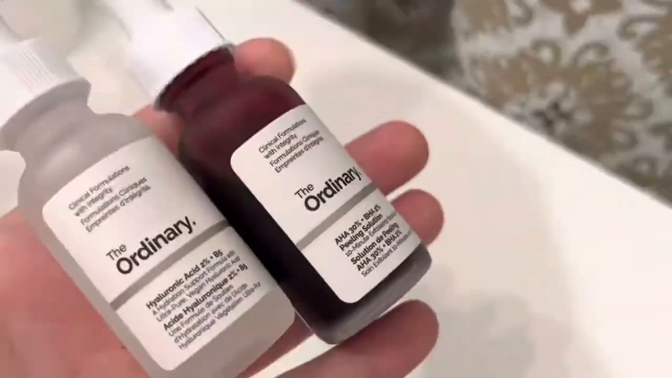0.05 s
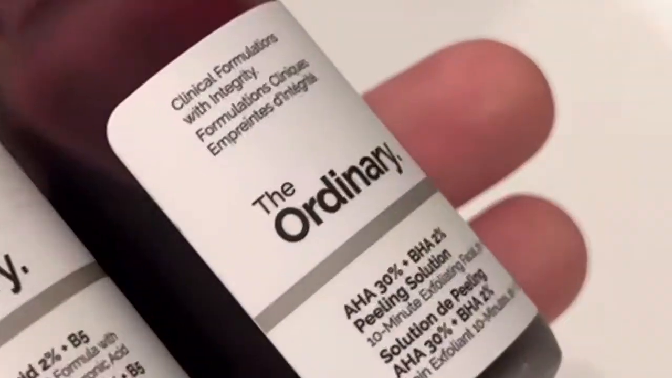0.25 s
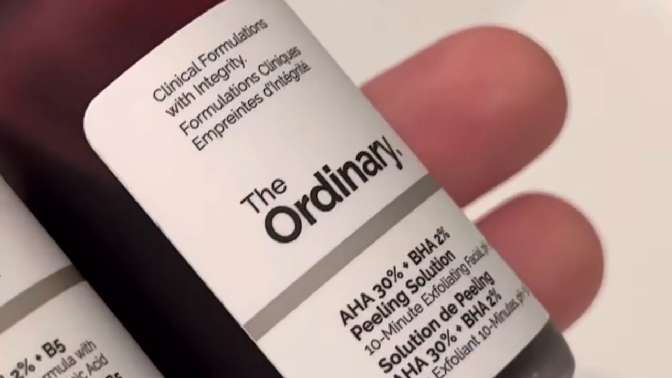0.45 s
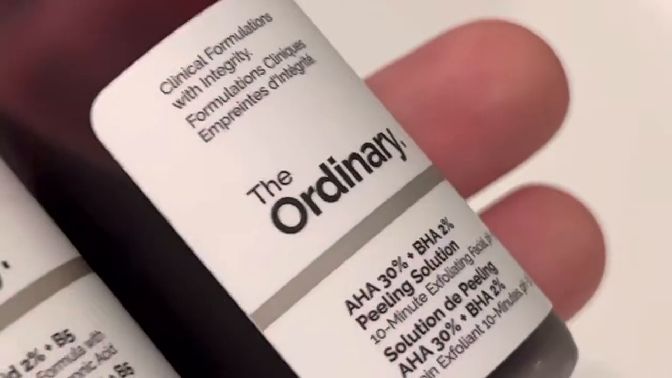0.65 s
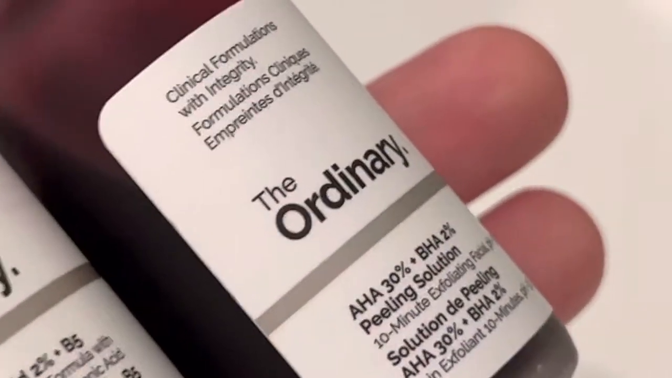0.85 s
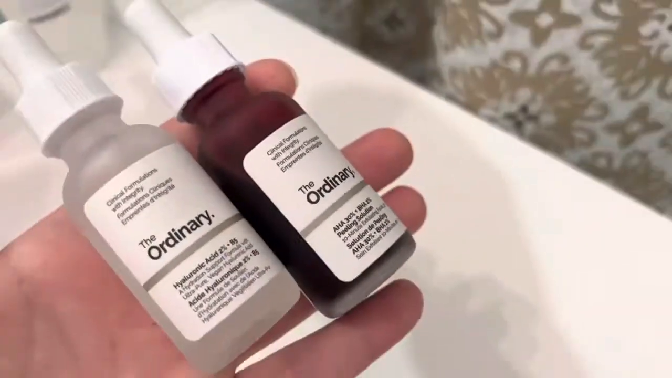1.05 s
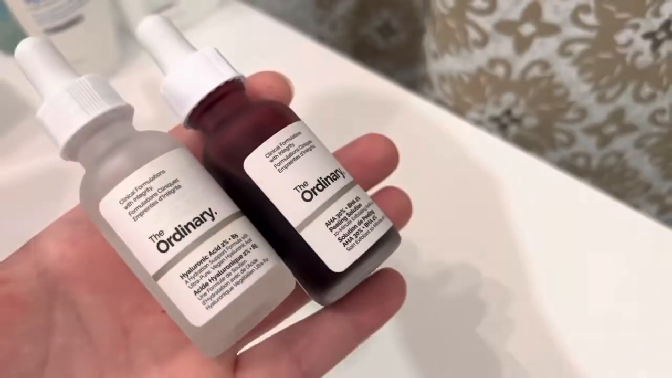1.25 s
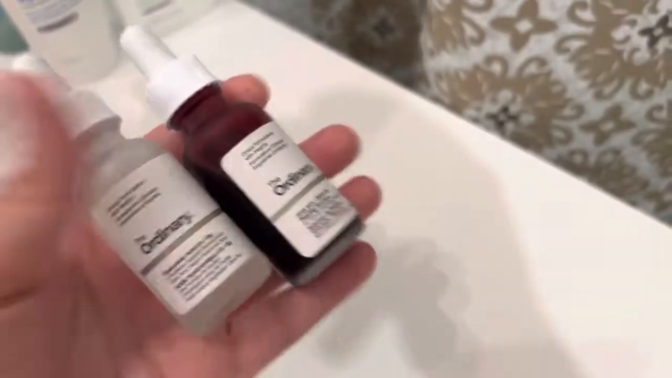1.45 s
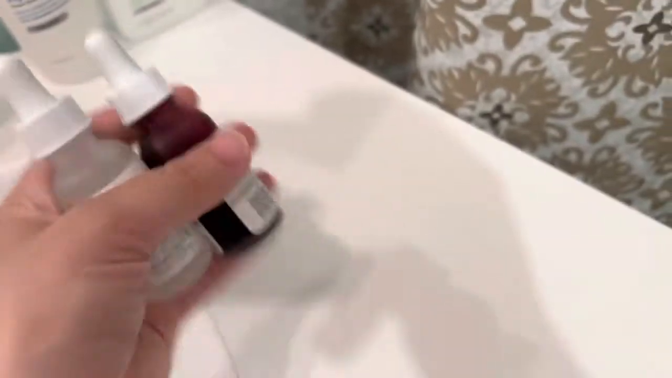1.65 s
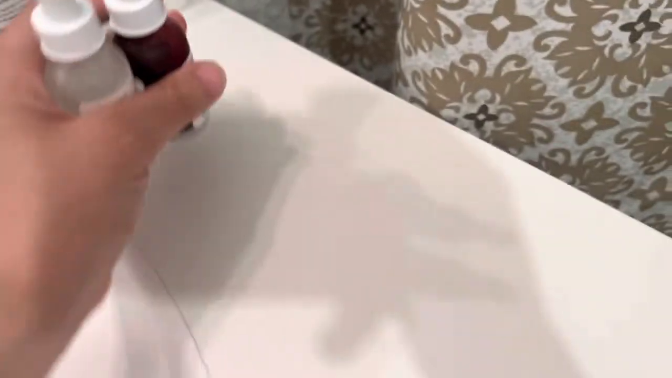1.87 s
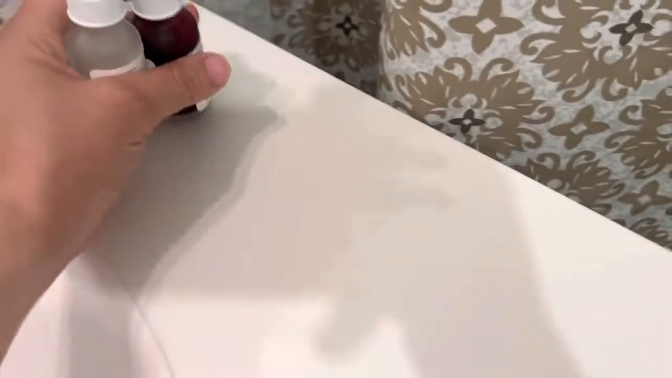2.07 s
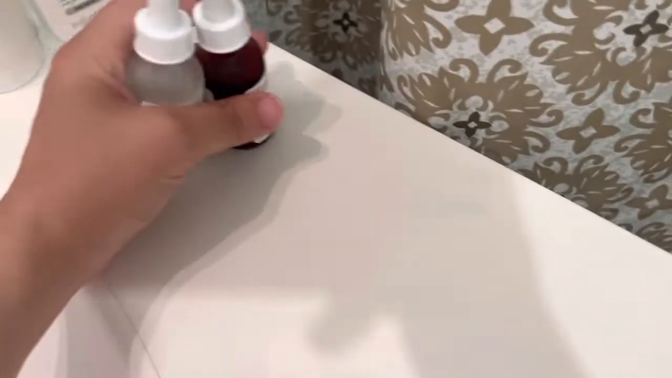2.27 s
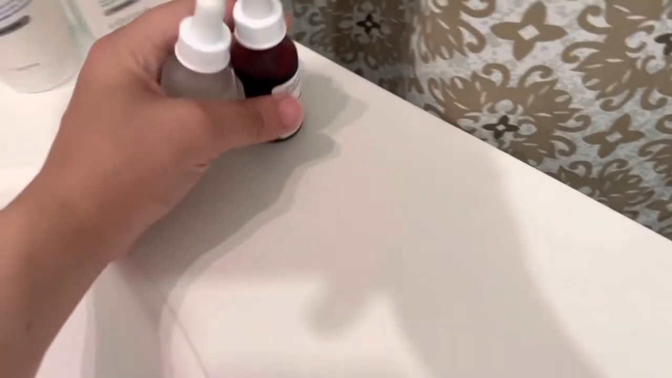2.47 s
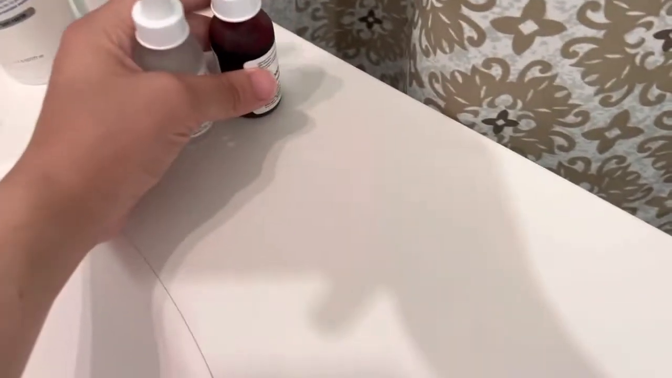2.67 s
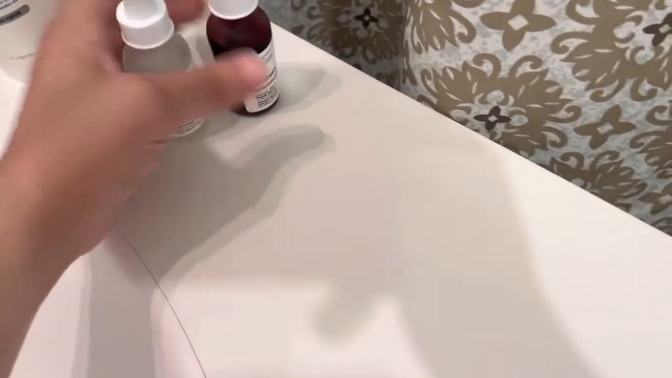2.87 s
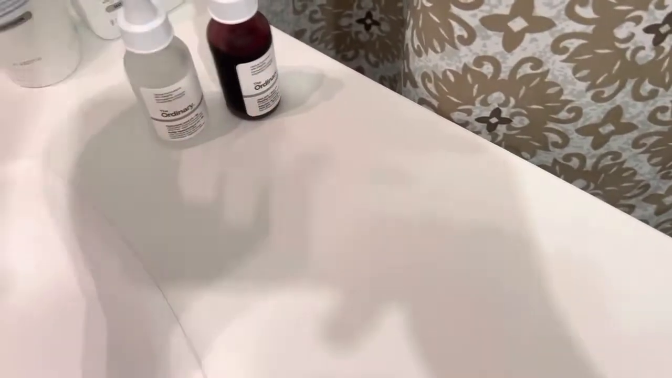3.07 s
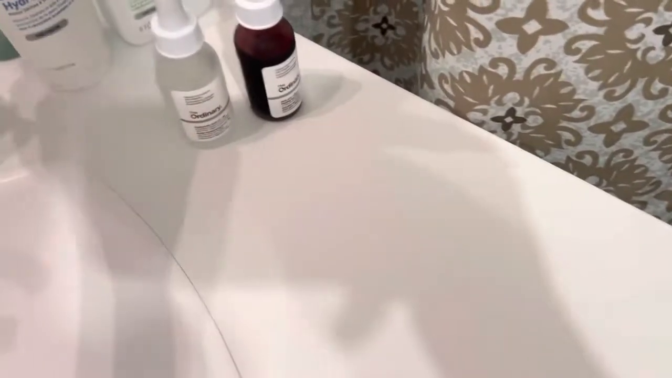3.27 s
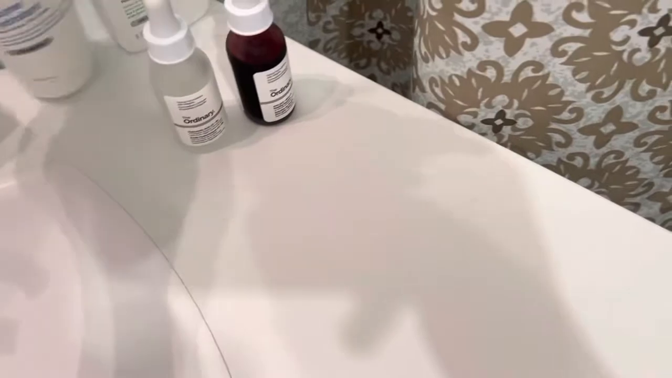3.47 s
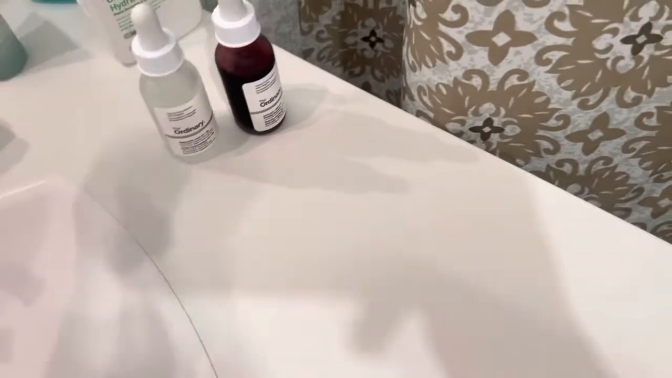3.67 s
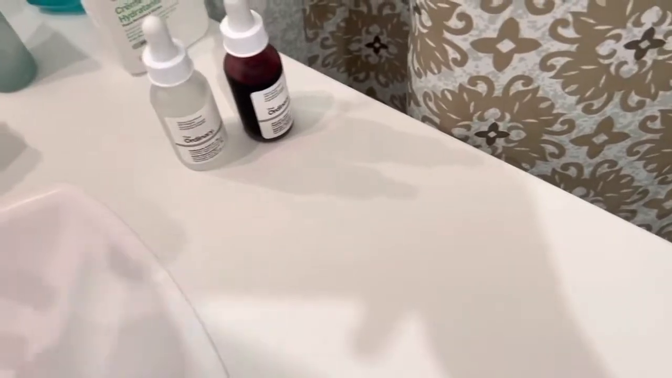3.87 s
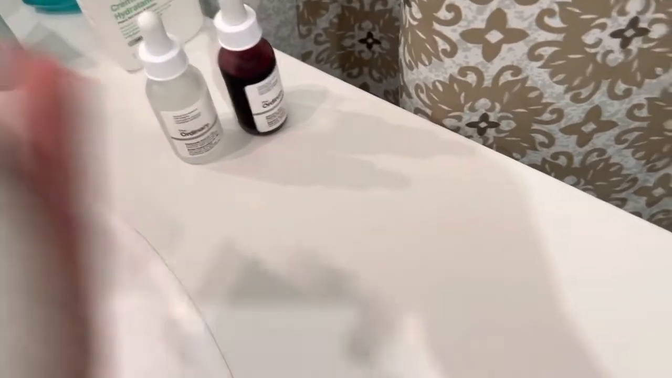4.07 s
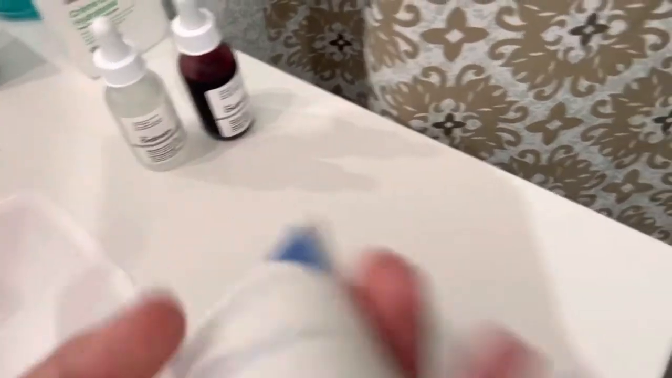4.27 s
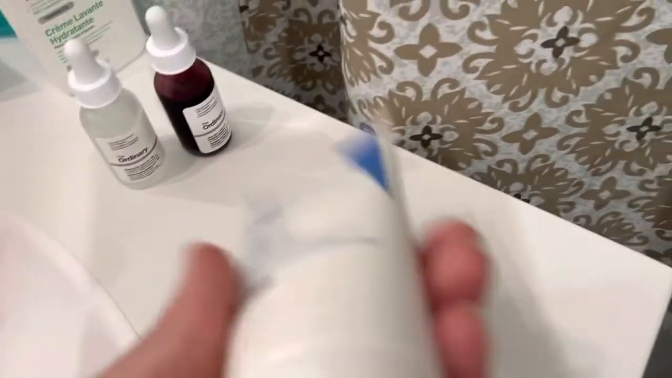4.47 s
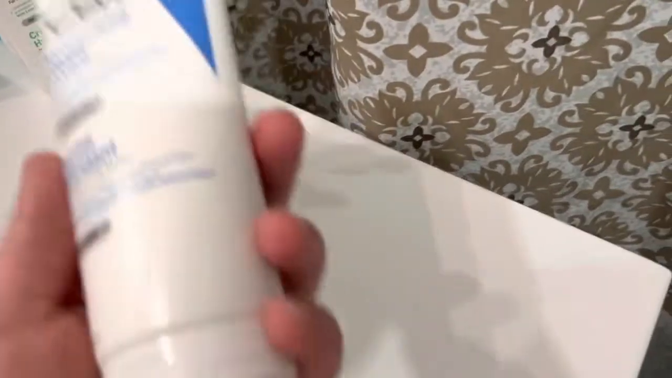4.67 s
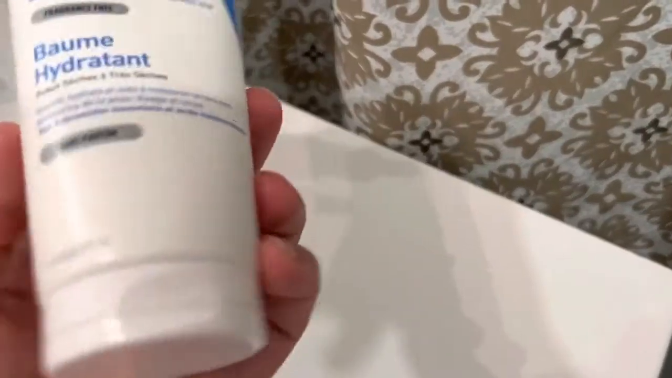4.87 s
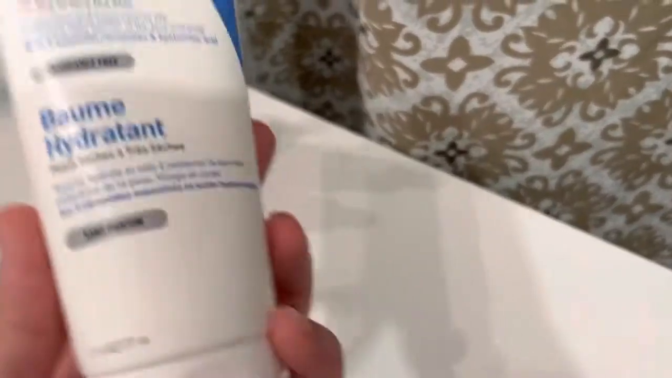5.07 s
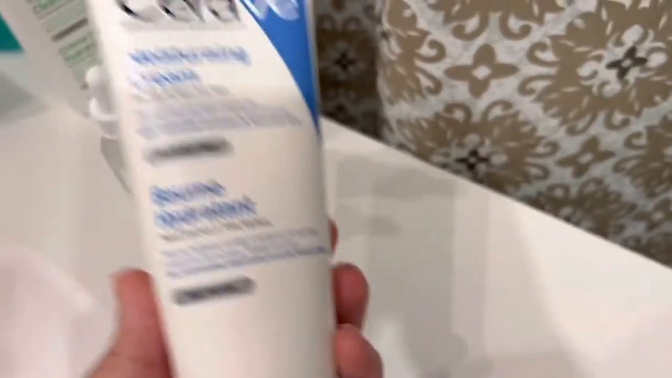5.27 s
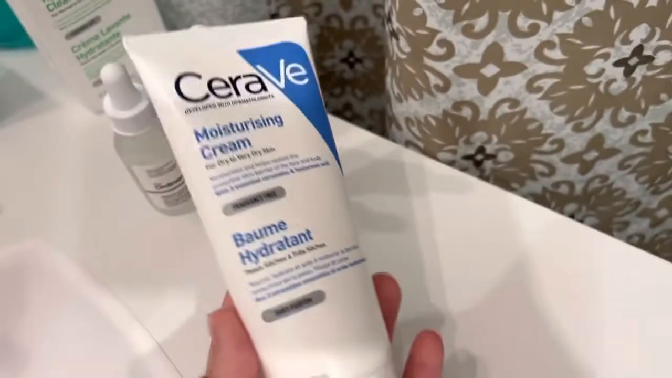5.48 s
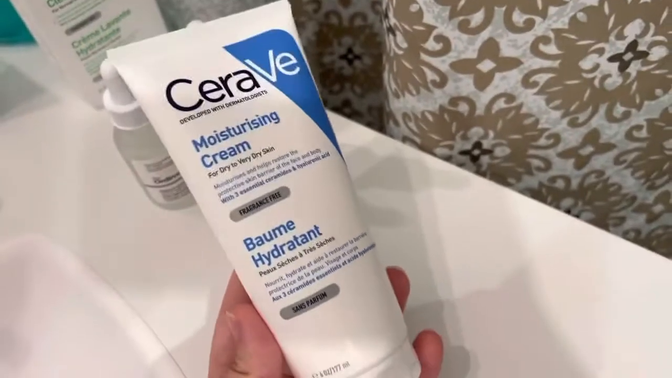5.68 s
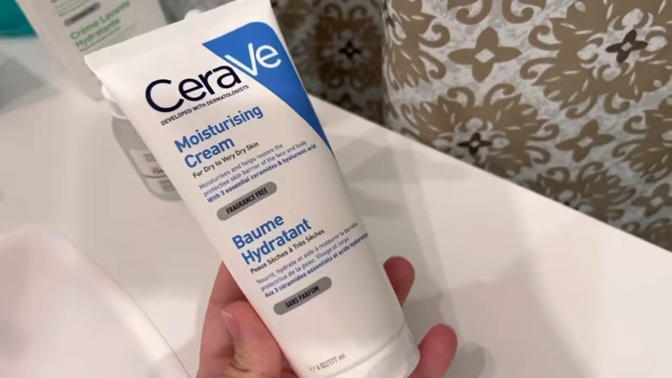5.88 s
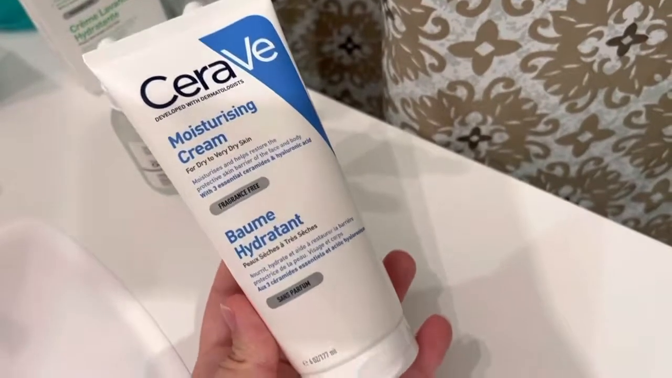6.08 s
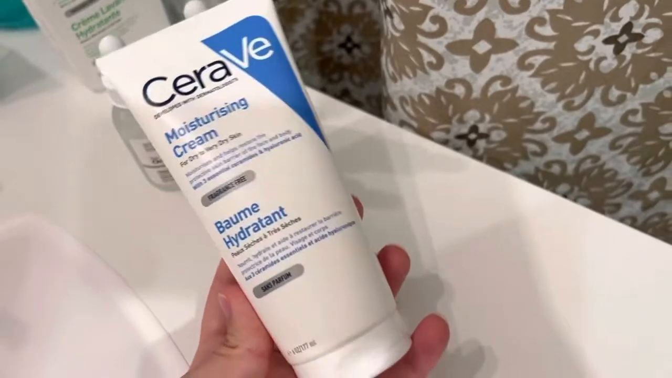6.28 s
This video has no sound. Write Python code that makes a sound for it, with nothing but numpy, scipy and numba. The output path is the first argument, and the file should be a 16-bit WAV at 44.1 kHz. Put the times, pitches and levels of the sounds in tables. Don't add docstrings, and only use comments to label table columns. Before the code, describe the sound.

A small, hard bathroom heard through a close stereo phone microphone, with a very quiet low building hum and slight hiss throughout. The first two seconds are nearly silent, with only barely audible finger brushes. At about 2.1 s a small glass bottle lands on a hollow stone counter with a sharp knock, a bounce and a smaller bounce by 2.2 s. At 2.46 s the second bottle lands slightly harder, with quick weakening bounces. Two duller knocks at 2.82 and 2.86 s settle it flat; counter and tiles ring briefly. From 3.3 s a faint bump and soft skin friction begin, with a light bright tap at 3.67 s. A firm double-edged plastic tap comes at 4.1 s, the rustle strongest around it, then fading until 4.9 s. A small cap clicks faintly at 5.1 s, followed by tiny ticks, a faint low bump near 5.5 s and near silence to about 6.4 s.

```python
import sys
import numpy as np
from scipy import signal
from scipy.io import wavfile
from scipy.ndimage import uniform_filter1d, map_coordinates
from numba import njit

SR = 44100
rng = np.random.default_rng(int(sys.argv[2]) if len(sys.argv) > 2 else 0)


def dump(signal):
    limited = np.clip(np.atleast_2d(signal).T, -1, 1)
    pcm = np.round(limited * 32767).astype(np.int16)
    wavfile.write(sys.argv[1], SR, pcm)


N = 279153
SIDES = np.array([[1], [-1]])


def undb(db):
    return 10 ** (np.asarray(db) / 20)


def read(table, hz):
    return np.interp(np.log(hz), np.log([f for f, _ in table]), [v for _, v in table])


@njit
def svf(x, hz, width):
    y, b, l = np.empty(len(x)), 0., 0.
    g, k = np.tan(np.pi * hz / SR), width / hz
    for i in range(len(x)):
        v = (b + g * (x[i] + 1e-18 - l)) / (1 + g * (g + k))
        b, l, y[i] = 2 * v - b, l + 2 * g * v, k * v
    return y


def band(x, hz, width_hz):
    hz, width_hz = 1. * hz, 1. * width_hz
    return np.array([svf(svf(c, hz, width_hz), hz, width_hz) for c in x])


def pair(noise, alike):
    alike = np.clip(alike, -.99, .99)
    mid, side = np.sqrt(1 + alike) * noise[0], np.sqrt(1 - alike) * noise[1]
    return (mid + side * SIDES) / np.sqrt(2)


def walk(rate_hz):
    k = int(SR / rate_hz)
    steps = np.repeat(rng.standard_normal(N // k + 1), k)
    return 1.3 * uniform_filter1d(uniform_filter1d(steps, k), k)[:N]


# pitch_hz, level_db
BLOW = [(50, -33), (130, -13), (300, -0.5), (1100, 1), (2000, -6), (3000, 9.5), (4500, 1), (6500, 0.5),
        (9000, 3.5), (12000, 2.5), (15500, -6.5)]
# pitch_hz, level_db
WET = [(60, -3), (300, -4.5), (1100, 3.5), (2500, -4), (5000, -0.5), (9000, 3), (15000, -2.5)]
# delay_s, level_db
ECHOES = [(.0022, -3), (.0049, -8), (.0084, -10.5), (0.0129, -8.5)]
# pitch_hz, fade_60db_s
ROOM = [(80, .45), (210, 0.57), (560, 0.38), (1470, 0.084), (2600, 0.29), (4500, 0.13), (8500, 0.24),
        (13000, .25)]
# pitch_hz, likeness (-1 to 1, no unit)
ROOM_ALIKE = [(60, 0.85), (130, 0.93), (290, 0.3), (640, 0.3), (1410, 0), (3100, -0.1), (6820, 1),
              (15000, 0.7)]


def click_in_room(colour, tick_db, room_db, tail_db, build_s, lag, pan_db):
    t = np.arange(SR * 3 // 4) / SR
    noise = rng.standard_normal((2, len(t)))
    click = np.zeros((2, len(t)))
    click[0, 0], click[1, int(lag)] = 1, 1
    echo = 0
    for delay_s, db in ECHOES:
        echo = echo + undb(db + room_db) * np.roll(click[::-1], int(delay_s * SR), axis=1)
    dull = bright = 0
    for hz in 45 * 2 ** np.arange(0, 8.6, .5):
        tail = (1 - np.exp(-t / build_s)) * undb(-60 * t / read(ROOM, hz) + tail_db + room_db)
        tail = tail * pair(noise, read(ROOM_ALIKE, hz)) * np.sqrt(1100 / hz / SR * 100)
        wet = echo / (1 + hz / 2500) + tail
        gain = undb(read(BLOW, hz) + SIDES * pan_db / 2 * min(hz / 900, 1))
        part = band(click + undb(read(WET, hz)) * wet, hz, hz * (0.52 + hz / 60000))
        part = gain * part * SR / hz / 3
        if hz > 2200:
            bright = bright + undb(tick_db) * part
        else:
            dull = dull + undb(read(colour, hz)) * part
    return dull, bright


def ring_body(body, body_db, colour, lag, pan_db):
    t, sound = np.arange(SR * 3 // 4) / SR, 0
    for hz, db, t60 in body:
        shift = 2 * np.pi * hz * lag / SR * SIDES / 2
        gain = undb(db + body_db + read(colour, hz) + SIDES * pan_db / 4 - 60 * t / t60)
        sound = sound + gain * np.sin(2 * np.pi * hz * t + shift) * np.minimum(t * hz / 0.66, 1)
    return sound


# pitch_hz, level_db, fade_60db_s
COUNTER = [(86.1, -10, 0.19), (165.6, -7, 0.46), (209.8, -13.5, 0.62), (269, -10, 0.41), (340, 0, 0.36),
           (424.4, 0.5, 0.28), (502, -15, 0.27), (615, -9, 0.4), (725, -13, 0.4), (770, -11.5, 0.4),
           (822, -9, 0.4), (885, -8, 0.22), (1020, -25.5, 0.25), (1338, -13, 0.19), (1450, -31.5, 0.073),
           (1617, -28.5, 0.36), (1770, -47.5, 0.52), (2000, -21, 0.31), (2106, -28, 0.26),
           (2175, -31, 0.29), (2415, -30, 0.24), (2616, -38, 0.3), (3000, -36.5, 0.49), (3000, -41.5, 0.27)]


def ring_counter(ring_db, colour, pan_db):
    t, sound = np.arange(SR * 3 // 4) / SR, 0
    for (hz, db, t60), (left, right, spot) in zip(COUNTER, rng.standard_normal((len(COUNTER), 3))):
        shift = .4 * left + np.array([[0], [right * min((hz / 650) ** 2, 2)]])
        grow = 1 - np.exp(-t * hz / 0.79)
        t60 = min(t60, .4 if hz < 450 else .26)
        pan = SIDES * pan_db / 2 * min(hz / 500, 1)
        gain = undb(db + 1.2 * spot + ring_db + read(colour, hz) + pan - 60 * t / t60)
        sound = sound + gain * grow * np.sin(2 * np.pi * hz * t * (1 + .004 * left) + shift)
    return sound


def hits(table, body, body_db, ring_db, tail_db, build_s, contact_hz, lag, pan_db):
    out = np.zeros((2, N + SR))
    soften = signal.butter(4, contact_hz, fs=SR, output="sos")
    for s, blow_db, thud_db, tick_db, room_db in table:
        colour = [(300, thud_db), (1100, 0)]
        dull, bright = click_in_room(colour, tick_db, room_db, tail_db, build_s, lag, pan_db)
        dull = dull + ring_body(body, body_db, colour, lag, pan_db)
        dull = dull + ring_counter(ring_db + room_db, colour, pan_db)
        sound = signal.sosfilt(soften, dull) + bright
        at = int((s + .0007) * SR)
        out[:, at:at + sound.shape[1]] += undb(blow_db) * sound
    return out[:, :N]


# start_s, blow_db, thud_db, tick_db, room_db
KNOCKS = [
    (2.126, -8, -13.5, -8, 4),
    (2.164, -17, -13, -11.5, 5),
    (2.232, -22, -10.5, -25, 2.5),
    (2.463, -5.5, -9, -14, 1),
    (2.487, -16.5, -3, -10.5, 4.5),
    (2.5, -27, -8, -7, -12),
    (2.557, -28.5, -8, -34, -13),
    (2.627, -36.5, 0, -17, 2.5),
    (2.683, -57.5, -5, -9, 9),
]
# start_s, blow_db, thud_db, tick_db, room_db
SETTLES = [
    (2.824, -22, -6.5, -14.5, 1.5),
    (2.863, -17.5, -6, -14, -2),
]
# pitch_hz, level_db, fade_60db_s
SLAB = [(309.6, 1, 0.066), (477, -6.5, 0.1), (1134, -8, 0.031), (1350, -16.5, 0.0099), (2960, -5.5, 0.11)]


def bottles():
    knocks = hits(KNOCKS, SLAB, body_db=1.0, ring_db=-10.0, tail_db=-1.0, build_s=0.0022,
                  contact_hz=1960, lag=8.5, pan_db=2.5)
    settles = hits(SETTLES, SLAB[:-1], body_db=0.5, ring_db=-11.5, tail_db=-1.5, build_s=0.0024,
                   contact_hz=1960, lag=8.5, pan_db=2.0)
    return knocks + signal.sosfilt(signal.butter(2, 6000, fs=SR, output="sos"), settles)


# start_s, blow_db, thud_db, tick_db, room_db
TAPS = [
    (3.301, -64, 20.5, -14, 0.5),
    (3.674, -41.5, 0, 3, -4.5),
    (4.0953, -26.5, 0.5, -6, -5.5),
    (4.097, -25, -6.5, -24.5, -6),
]
# start_s, blow_db, thud_db, tick_db, room_db
TICKS = [(0.7143, -58, 1, -24, -13), (3.2791, -51.5, -9, 0, 4.5), (3.3696, -62, -2, 2.5, -8),
         (3.968, -56, -1, 1, 2.5), (4.8396, -50.5, -5, -4, -5), (5.0139, -71, -2, -3, -0.5),
         (5.3876, -63, -5, 0.5, -5), (5.5139, -65.5, 1, 1, -3.5)]
# pitch_hz, level_db, fade_60db_s
TUBE = [(690, -6, 0.042), (1208, -1.5, 0.011), (2150, 6, 0.063)]


def tube_taps():
    return hits(TAPS + TICKS, TUBE, body_db=-6.5, ring_db=-17.0, tail_db=-3.5, build_s=0.00053,
                contact_hz=1900, lag=11, pan_db=4.0)


# start_s, blow_db, thud_db, tick_db, room_db
CAP_CLICKS = [
    (5.0935, -41, -22, -1, -3),
    (5.119, -51, -12, -15, -1),
    (5.1245, -58, -12, 0, 1),
]
# pitch_hz, level_db, fade_60db_s
CAP = [(824, -4, 0.068), (1290, 3.5, 0.023), (2190, 1, 0.023), (3100, -12.5, 0.057), (3610, -9.5, .02),
       (4400, -6, 0.01)]


def cap_clicks():
    return hits(CAP_CLICKS, CAP, body_db=-4, ring_db=-16, tail_db=0.5, build_s=0.0027,
                contact_hz=5000, lag=8.5, pan_db=5)


def friction_power(table, pan_db, layer_db, slope):
    t, power = np.arange(N) / SR, 0
    for s, rise_s, fall_s, db, pressure_db in table:
        away = np.where(t < s, (s - t) / rise_s, (t - s) / fall_s)
        fade_db = 20 * away ** 1.8
        power = power + undb(db + layer_db + slope * pressure_db - fade_db) ** 2
    return power * undb(SIDES * pan_db)


# fastest_s, rise_s, fall_s, level_db, pressure_db
STROKES = [(3.374, 0.011, .05, -65, 7.5), (3.395, .025, 0.075, -64, 8), (3.56, 0.18, 0.35, -74.5, 12),
           (3.674, 0.0066, .01, -49, -1), (3.69, 0.058, 0.041, -61, 10), (3.82, 0.13, 0.078, -59.5, 3),
           (3.885, 0.035, 0.061, -59, -1), (3.94, .06, .06, -74, 10), (3.972, 0.0061, 0.097, -62.5, 7.5),
           (4.02, 0.059, .16, -56, -2.5), (4.105, .05, 0.042, -47.5, -3.5), (4.25, 0.1, 0.072, -52.5, -1.5),
           (4.34, 0.3, .22, -56.5, -3), (4.52, 0.074, 0.12, -57.5, -3), (4.71, 0.079, 0.11, -64, -6),
           (4.79, 0.085, 0.033, -62.5, -1.5), (4.87, 0.073, 0.063, -70.5, 4.5)]
# fastest_s, rise_s, fall_s, level_db, pressure_db
BRUSHES = [(1.545, .08, .04, -80, 9), (1.63, .05, 0.064, -85.5, -2), (1.98, 0.58, 0.38, -84.5, 14),
           (2.122, .02, .006, -64.5, 14.5), (2.455, 0.041, 0.03, -58.5, 20),
           (5.02, 0.017, 0.022, -73, -3.5), (5.13, 0.059, 0.11, -71.5, 13), (5.32, .09, 0.053, -82, 10.5),
           (5.4, 0.031, 0.05, -79.5, 10.5), (5.54, 0.16, 0.12, -84.5, 14), (6.0, 0.13, 0.18, -88, 19.5),
           (6.17, 0.038, 0.074, -83.5, 10.5), (6.29, 0.096, .1, -91, 13.5)]
# fastest_s, rise_s, fall_s, level_db, pressure_db
SLIDES = [(2.23, 0.11, 0.039, -61, 17), (2.33, 0.087, 0.07, -77, 18), (2.579, 0.15, 0.033, -62, 9),
          (2.7, 0.088, 0.083, -79, 23), (2.81, .06, .04, -78, 2), (2.93, 0.039, 0.074, -81.5, 17.5)]


def rub(grain_db, lag, sway):
    # low_hz, high_hz, level_db at no pressure, dB per dB of pressure
    layers = [(2600, 10100, 0, 0),
              (380, 850, -9, 0.65),
              (850, 2600, -14, 1.1),
              (10100, 17000, -2.5, -1.5)]
    slips = undb(grain_db * np.minimum(rng.exponential(size=N), 5))
    place = np.arange(N) + lag + sway * walk(3)
    out = 0
    for low_hz, high_hz, layer_db, slope in layers:
        grains = pair(slips * rng.standard_normal((2, N)), .7)
        grains[0] = map_coordinates(grains[0], [place], order=3, mode="wrap")
        layer = signal.sosfilt(signal.butter(2, (low_hz, high_hz), "band", fs=SR, output="sos"), grains)
        power = friction_power(STROKES, 1, layer_db, slope)
        power = power + friction_power(BRUSHES + SLIDES, -0.85, layer_db, slope)
        out = out + np.sqrt(power) * layer / layer.std()
    return out * undb(1.5 * walk(33) - 2.0)


# start_s, length_s, pitch_hz, width_hz, level_db
SQUEAKS = [(1.025, 0.06, 2780, 300, -88), (1.485, 0.085, 8400, 400, -76.5), (1.86, 0.054, 6900, 740, -89),
           (1.726, 0.11, 1430, 120, -88), (1.97, .12, 690, 130, -78), (3.777, 0.11, 670, 44, -69.5),
           (4.599, .24, 550, 43, -76), (4.22, 0.15, 1370, 250, -69.5), (3.292, .03, 230, 170, -50),
           (4.09, .028, 210, 160, -47), (4.2, 0.089, 584, 200, -66), (3.45, 0.15, 560, 250, -72),
           (5.49, 0.049, 82, 31, -49), (6.145, 0.054, 3140, 520, -80)]


def squeaks():
    out = np.zeros((2, N))
    for s, length_s, hz, width_hz, db in SQUEAKS:
        at, n = int(s * SR), int(length_s * SR)
        tone = band(pair(rng.standard_normal((2, SR // 4)), 0.91), hz, width_hz)[:, -n:]
        out[:, at:at + n] += undb(db) * tone / tone.std() * np.sqrt(np.hanning(n))
    return out


# pitch_hz, level_db (per Hz)
HUM = [(13, -51), (22, -18), (37, -7), (81, 0), (119, -10), (207, -6), (245, -19.5), (361, -11), (392, -36),
       (594, -29.5), (1030, -39), (1900, -40.5), (2650, -50), (5450, -51), (16500, -68)]
# pitch_hz, likeness (0 to 1, no unit)
HUM_ALIKE = [(60, 0.6), (130, 1), (290, 0.9), (640, 0.2), (1410, 0), (3100, 0.49), (6820, 0.64),
             (15000, 0.07)]


def hum(level_db, pan_db):
    out, swell = 0, walk(0.27)
    for hz in 25 * 2 ** np.arange(0, 9.4, 1 / 4):
        noise = band(pair(rng.standard_normal((2, N)), read(HUM_ALIKE, hz)), hz, hz * 0.25)
        out = out + undb(read(HUM, hz) + .4 * swell + 1.2 * walk(6)) * noise
    return out * undb(level_db + pan_db / 2 * SIDES) / out.std()


def scene():
    hand = tube_taps() + cap_clicks() + rub(grain_db=3.0, lag=22, sway=2.8) + squeaks()
    return bottles() + hand + hum(level_db=-62, pan_db=1.)


@njit
def limit(x, top, ratio, attack, release):
    y, e = np.empty_like(x), 0.
    for i in range(x.shape[1]):
        a = max(abs(x[0, i]), abs(x[1, i]))
        e += (a - e) * (attack if a > e else release)
        y[:, i] = x[:, i] * (min(1., top / (e + 1e-9)) ** (1 - 1 / ratio))
    return y


def roll_off(x):
    return signal.sosfilt(signal.butter(12, 16950, fs=SR, output="sos"), x)


def record(dry):
    held = np.tanh(1.369 * limit(dry, 0.29, 2.4, .02, .0006)) / 0.74
    held = signal.sosfilt(signal.butter(3, 44, "high", fs=SR, output="sos"), held)
    for edges_hz in [(9950, 10500), (13350, 14300)]:
        held = signal.sosfilt(signal.cheby2(3, 32, edges_hz, "bandstop", fs=SR, output="sos"), held)
    mix = held * .02 + signal.sosfilt(signal.ellip(8, .3, 60, 15750, fs=SR, output="sos"), held)
    return roll_off(mix)


dry = scene()
out = record(dry)
dump(out)
```